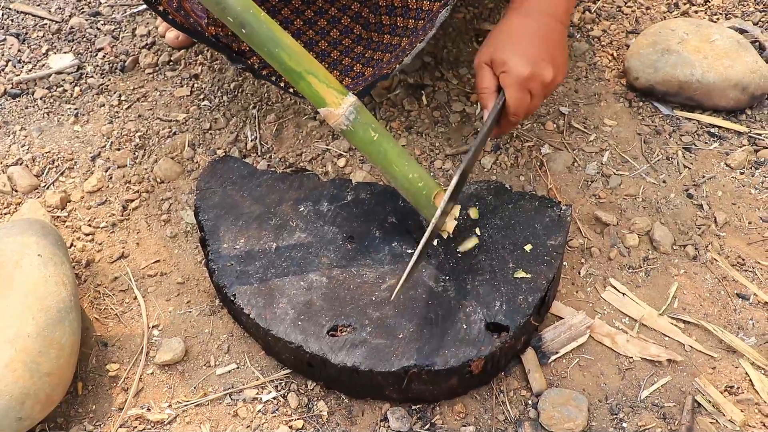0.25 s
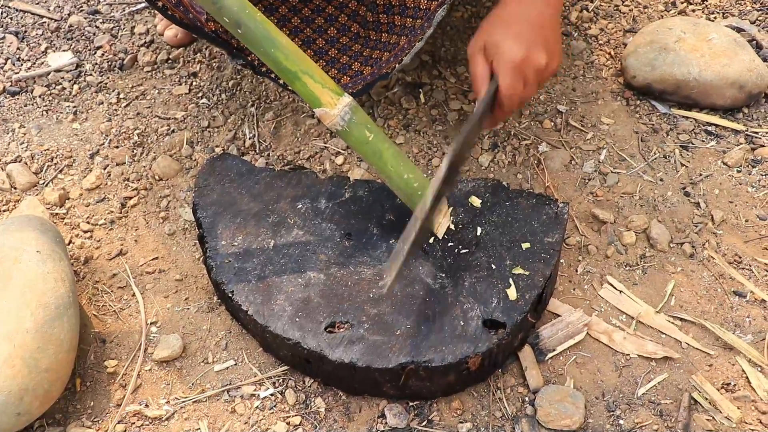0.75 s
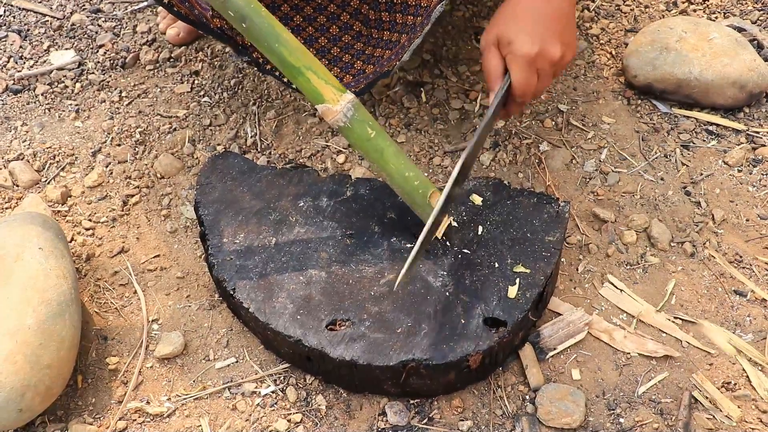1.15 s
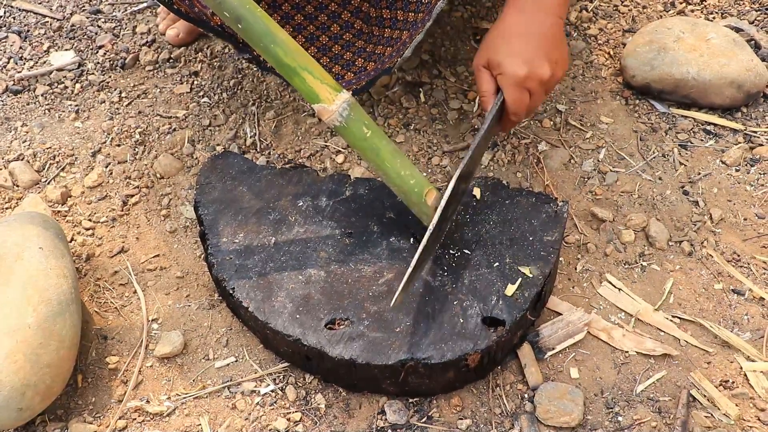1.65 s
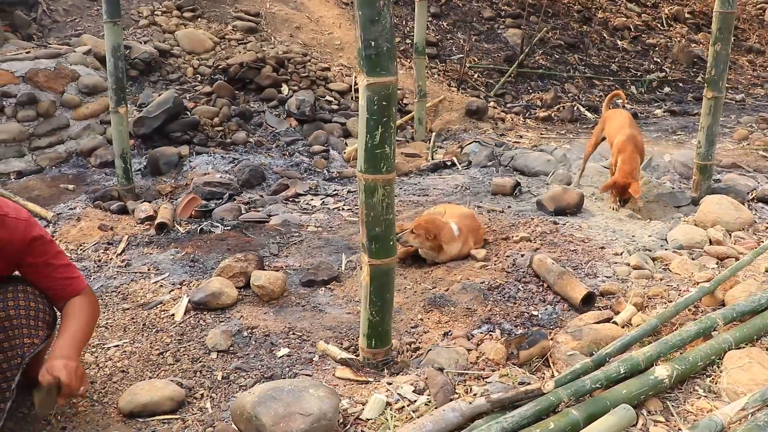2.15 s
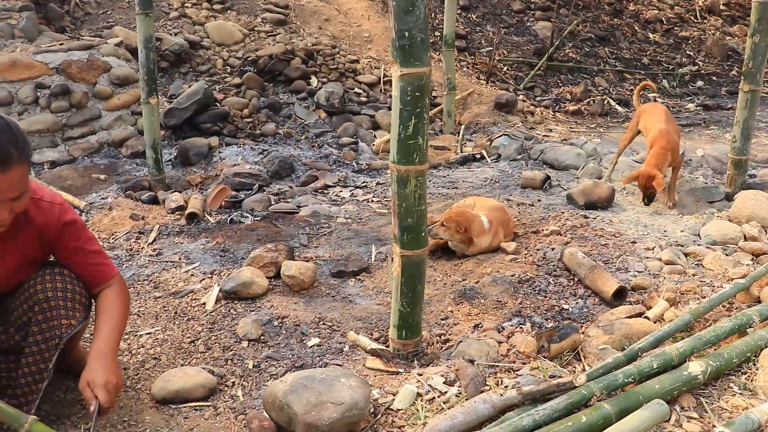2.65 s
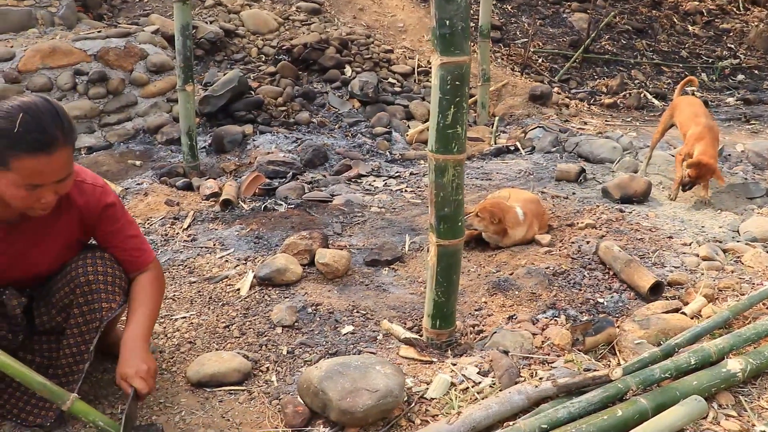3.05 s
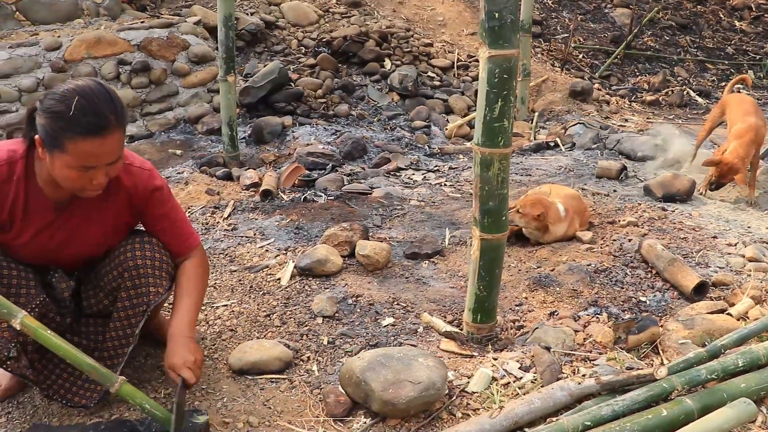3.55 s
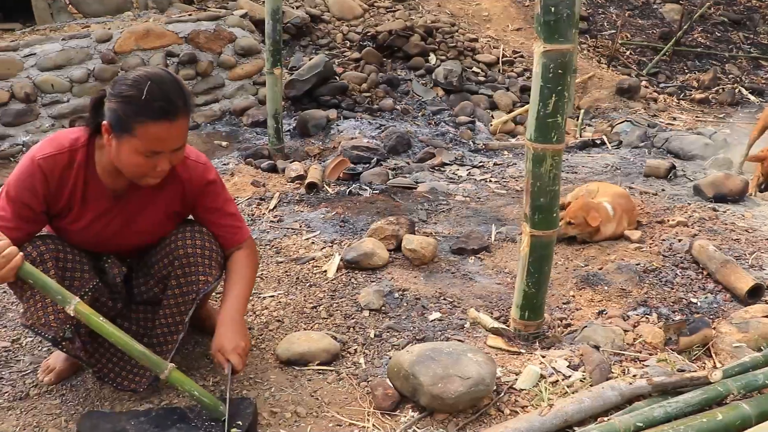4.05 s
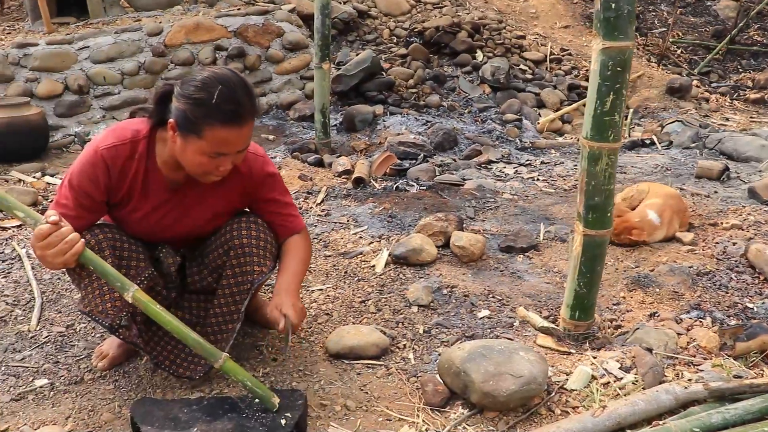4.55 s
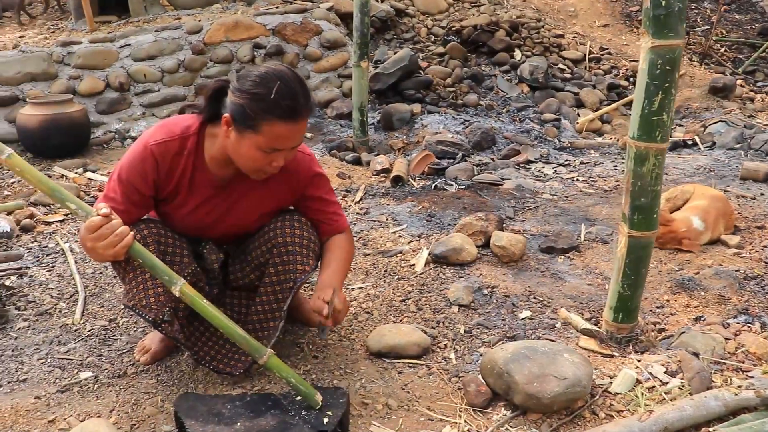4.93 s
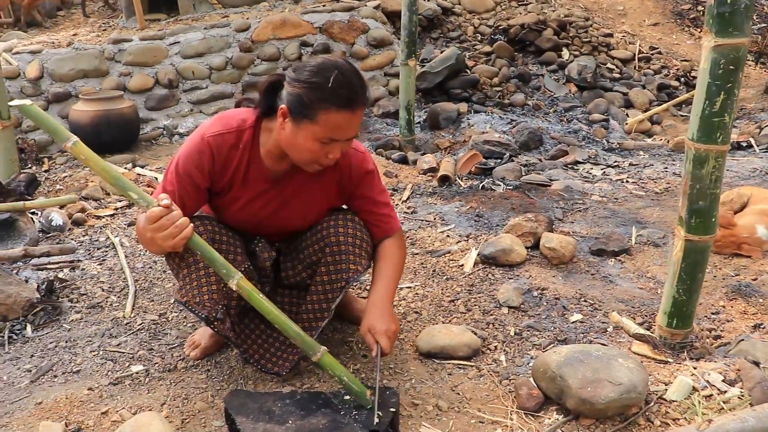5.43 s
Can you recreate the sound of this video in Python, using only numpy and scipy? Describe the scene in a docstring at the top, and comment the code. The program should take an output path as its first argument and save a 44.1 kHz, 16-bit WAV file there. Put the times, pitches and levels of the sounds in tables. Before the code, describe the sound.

A soft, low outdoor rush lies under everything. From 0 to 1.67 s the microphone is close to a heavy knife chopping green bamboo on a wooden block. Strokes at about 0.14, 0.51, 0.84, 1.16 and 1.47 s are short, dry crunches of snapping fibre with a bright splintery edge; the first two also hit the block with a loud, woody, hollow knock and a slight steel ring. Across the yard a chick gives rapid high peeps, falling then hooking upward, with a few faint fowl and bird calls. Total silence from 1.67 to 1.87 s. Then, a few steps away, thinner chops at about 1.88, 2.42, 3.05, 3.63, 4.06, 4.43, 4.80, 5.12 and 5.44 s, several with hollow tube knocks, especially 4.07 and 4.80. They carry more open-air scatter and a dull wall echo. Faint ticks and sandy scuffing fill gaps around 3.2 to 4.4 and 5.2 s.

```python
"""A forest yard with soft outdoor air, where a chick, other fowl and birds call across the yard.
A heavy knife chops a green bamboo pole on a wooden block: each stroke crunches through bursts of snapping fibres.
Some strokes knock on the block, where wood, hollow tube and steel ring together as resonances and dying sines.
Five strokes are heard with the microphone close by; after a short silence, nine more from a few steps away,
with more of the yard's scatter, a dull echo from a wall and faint spells of scuffing on dry ground."""
import sys
import numpy as np
from scipy import signal
from scipy.fft import rfft, irfft
from scipy.io import wavfile
from scipy.ndimage import uniform_filter1d

SR = 44100
rng = np.random.default_rng(int(sys.argv[2]) if len(sys.argv) > 2 else 0)


def transcribe(u):
    """Save the signal u as a 16-bit wav file named by the first command-line argument.

    u: samples, shape (n,) or (channels, n), limited to [-1, 1]; the rate is SR.
    q: integer samples, one column per channel.
    """
    v = np.clip(np.atleast_2d(u).T, -1, 1)
    q = np.round(v * 32767).astype(np.int16)
    wavfile.write(sys.argv[1], SR, q)


N = 250929
SILENCE_START_S, SILENCE_END_S = 1.665, 1.871  # between the close and the farther position
TAPS = 8192
HZ = np.fft.rfftfreq(TAPS, 1 / SR)

# The blade biting into the fibres, twice in each of the first two strokes. Each row: start in seconds,
# level in dB, length in seconds, brightness in dB per octave, pitch of the freed splinter in Hz.
CUTS = [(0.1401, -28.5, 0.0067, 1, 2370), (0.1454, -26, 0.013, -1.6, 2420), (0.508, -37, 0.014, -2.5, 2280),
        (0.5217, -32, 0.0068, 0.9, 4370), (0.8355, -24, 0.013, 0.4, 4340), (1.164, -22.5, 0.01, 0.5, 1626),
        (1.4679, -24.5, 0.0097, -0.5, 3413), (1.8753, -31, 0.0058, -0.2, 2610),
        (2.4245, -29, 0.0065, 0.45, 2773), (3.0467, -26.5, 0.0083, 1.6, 1520),
        (3.6251, -25.5, 0.01, 0.4, 3320), (4.0611, -28.5, 0.006, -0.3, 2580),
        (4.4308, -28.5, 0.0095, 1.8, 3380), (4.7992, -28, 0.0031, -0.5, 3310),
        (5.123, -28, 0.0072, 1.5, 3560), (5.438, -26.5, 0.013, 3, 2580)]
# Resonances of the pole. Each row: frequency in Hz, width in Hz, height in dB.
POLE = [(940, 35, 11), (1267, 47, 14.5), (1590, 27, 18), (2014, 60, 13.5), (2424, 120, 3.5),
        (2700, 130, 4.5), (3080, 80, 6.5), (3530, 82, 4.5), (4700, 80, 3.5), (5256, 88, 10),
        (5760, 130, 8.5), (7630, 120, 1), (9300, 30, 3)]
# Broad colour of the snapping fibres. Each row: frequency in Hz, relative level in dB per Hz.
FIBRE = [(40, -26.5), (110, -7), (200, -6.5), (350, -7.5), (600, -0.5), (1500, -4), (3000, 2), (4200, -3.5),
         (6000, -5), (9000, -8), (13000, -9.5), (16000, -19)]


def amp(db):
    """Decibels to gain."""
    return 10 ** (np.asarray(db) / 20)


def evened(x):
    """Scales to rms 1."""
    return x / np.sqrt(np.mean(x ** 2) + 1e-20)


def read(points, hz):
    """Reads a table of (Hz, value) on a log-frequency axis."""
    table_hz, value = np.transpose(points)
    return np.interp(np.log(hz + 1), np.log(table_hz), value)


def add(mix, s, sound):
    """Mixes a sound in at time s, in seconds."""
    start = round(s * SR)
    sound = sound[max(-start, 0):]
    part = mix[max(start, 0):][:len(sound)]
    part += sound[:len(part)]


def at_level(x, db):
    """Gives a blow the energy of 20 ms at this level."""
    return amp(db) * x / np.sqrt(np.sum(x ** 2) / (SR / 50))


def from_here(s, near, far):
    """Picks what holds for the microphone's distance at time s."""
    return far if s > SILENCE_START_S else near


def air(patch_db=1.6, level_db=-66.5):
    """Soft outdoor rush: coloured noise with slowly drifting patches, under a slow swell."""
    # Each row: frequency in Hz, relative level in dB per Hz.
    air_colour = [(25, -10), (55, 1.5), (85, -7), (150, -9), (380, -14), (900, -10), (1300, -13),
                  (2000, -16.5), (3200, -21.5), (5500, -26), (8000, -33), (12000, -32.5), (16000, -37)]
    # Each row: time in seconds, level in dB on top of level_db.
    swell = [(0, 9.5), (1.602, 8.5), (1.9, 6.5), (5.6, 9.5)]
    hz, t, z = signal.stft(rng.standard_normal(N), SR, nperseg=2048, noverlap=1536)
    patches = uniform_filter1d(rng.standard_normal(z.shape), size=20, axis=0)
    patches = evened(uniform_filter1d(patches, size=8, axis=1))
    gain = amp(read(air_colour, hz)[:, None] + patch_db * patches)
    rush = signal.istft(z * gain, SR, nperseg=2048, noverlap=1536)[1][:N]
    return evened(rush) * amp(level_db + np.interp(np.arange(N) / SR, *np.transpose(swell)))


def whistle(hz, db, octave_db, flutter_db=3.5, edge_s=0.0059, waver=0.007):
    """A near sine and its overtones; their levels flutter, and the pitch wavers more towards the end."""
    t = np.arange(len(hz)) / SR
    jitter = evened(uniform_filter1d(rng.standard_normal(TAPS * 2), size=60))[:len(t)]
    flutter = evened(uniform_filter1d(rng.standard_normal((2, TAPS * 2)), size=450))[:, :len(t)]
    wavering = 1 + waver * (0.5 + 2 * (t / t[-1]) ** 2) * jitter
    phase = 2 * np.pi * np.cumsum(hz * wavering) / SR
    ground = amp(db + flutter_db * flutter[0]) * np.sin(phase)
    overtones = np.sin(2 * phase) + amp(-18.5) * np.sin(3 * phase)
    tone = ground + amp(octave_db + flutter_db * flutter[1]) * overtones
    edges = np.minimum(np.minimum(t, t[::-1]) / edge_s, 1)
    return np.sqrt(2) * tone * edges


def chick(glide_octave_db=-63, hook_octave_db=-71, fade_db=-12):
    """Each peep glides down, then dips and hooks up, fading as it rises; overtones peak in mid-glide."""
    # Each row: start in seconds, length of the glide in seconds, first pitch in Hz,
    # level of the glide in dB, level of the closing hook in dB.
    peeps = [(-.02, 0.13, 4634, -54, -57), (0.216, 0.074, 4780, -63, -59.5),
             (0.413, 0.084, 4760, -54.5, -47), (0.599, 0.081, 4840, -57, -43.5),
             (0.776, 0.067, 4820, -54, -46), (.937, 0.065, 4850, -49, -37.5),
             (1.108, .042, 4860, -53, -52.5), (1.268, .028, 5120, -58, -45.5),
             (1.411, 0.039, 5560, -58.5, -49)]
    sag_hz_per_s = 4400  # steady sinking during the glide
    hook_s = 0.029  # down and back up
    dip_target_hz, dip_share = 3650, 0.49  # the hook dips this share of the way to the target
    accent_db, accent_s = 2.5, 0.012  # brief accent at the start
    out = np.zeros(N)
    for s, glide_s, first_hz, glide_db, hook_db in peeps:
        t = np.arange(round((glide_s + hook_s) * SR)) / SR
        glide = np.minimum(t / glide_s, 1)
        hook = np.clip((t - glide_s) / hook_s, 0, 1)
        glide_hz = first_hz - sag_hz_per_s * glide_s * glide
        hz = glide_hz - dip_share * (glide_hz - dip_target_hz) * np.sin(np.pi * hook) ** 2
        db = np.interp(hook, [0, 0.2, 0.55, 1], [glide_db, hook_db, hook_db, hook_db + fade_db])
        db += accent_db * np.exp(-t / accent_s)
        octave_db = hook_octave_db + (glide_octave_db - hook_octave_db) * np.sin(np.pi * glide)
        add(out, s, whistle(hz, db, octave_db))
    return out


def birds(octave_db=-19, settle=2.0):
    """Each distant call slides from one pitch to another, fast at first and then settling."""
    # Plain calls of hens and other birds farther off. Each row: start in seconds, length in seconds,
    # first pitch in Hz, last pitch in Hz, level in dB.
    calls_afar = [(0.069, 0.045, 1175, 970, -54.5), (0.311, 0.085, 933, 898, -61.5),
                  (0.581, .055, 7400, 4690, -57.5), (0.873, 0.11, 470, 616, -57.5),
                  (2.118, 0.037, 5190, 5220, -68), (3.938, 0.022, 1090, 1153, -56)]
    out = np.zeros(N)
    for s, length, first_hz, last_hz, db in calls_afar:
        left = np.linspace(1, 0, round(length * SR))
        hz = last_hz + (first_hz - last_hz) * left ** settle
        add(out, s, whistle(hz, db, db + octave_db))
    return out


def scatter(t60_scale):
    """Diffuse returns from stones, ground and trees: noise in which each band dies at its own speed."""
    # Each row: frequency in Hz, t60 in seconds before t60_scale.
    band_decay = [(100, 0.54), (260, 0.27), (700, 0.075), (1800, .11), (5000, 0.14), (13000, 0.078)]
    hz, t, z = signal.stft(rng.standard_normal(SR // 2), SR, nperseg=128)
    t60 = t60_scale * read(band_decay, hz)[:, None]
    tail = signal.istft(z * amp(-60 * t / t60), SR, nperseg=128)[1]
    tail *= 1 - np.exp(-(np.arange(len(tail)) / SR / 0.0014) ** 2)  # soft onset
    return tail / np.linalg.norm(tail)


def fowl(scatter_db=-11):
    """The chick and the other birds call from across the yard, blurred by its scatter."""
    calls = chick() + birds()
    return calls + amp(scatter_db) * signal.fftconvolve(calls, scatter(0.71))[:N]


def body(spectrum, resonances, tilt_db):
    """Causal (minimum-phase) impulse response of a broad colour with resonances standing out of it."""
    peaks = 1 + sum(amp(db) ** 2 / (1 + (2 * (HZ - hz) / width) ** 2) for hz, width, db in resonances)
    slope = tilt_db * np.log2(np.maximum(HZ, 400) / 400)  # dB, from 400 Hz up
    log_gain = np.log(amp(read(spectrum, HZ) + slope) * np.sqrt(peaks))
    circle = np.r_[log_gain, log_gain[-2:0:-1]]
    response = np.exp(np.conj(signal.hilbert(circle)))[:len(HZ)]
    return irfft(response)[:TAPS // 2]


def crunch(length, spread_db=3, snaps_per_s=9000):
    """Fibres snap in quick succession while the edge moves; the push is even in the bass, ragged in the treble."""
    u = np.arange(TAPS // 4) / (length * SR)
    stroke = np.minimum(0.35 + 2 * u, 1) / (1 + u ** 8)
    sizes = amp(spread_db * np.minimum(rng.exponential(1, len(u)), 3)) * rng.choice([-1, 1], len(u))
    snaps = sizes * (rng.random(len(u)) < snaps_per_s / SR)
    rasp = 0.38 * rng.standard_normal(len(u))
    z = rfft(stroke * (snaps + rasp), TAPS)
    ripple = evened(np.sqrt(uniform_filter1d(abs(z) ** 2, size=9) + 1e-9))
    evenness = read([(2000, 0.9), (5000, 0.3)], HZ)
    return irfft(z / ripple ** evenness)[:len(u)] / (1 + (u / 2) ** 4)


def cuts(splinter_width=85, splinter_db=14):
    """The edge crunches into the ringing pole; each cut frees a splinter of its own pitch."""
    # Further resonances of the pole pressed on the block, heard from close by and from farther off.
    # Each row: frequency in Hz, width in Hz, height in dB.
    held_near = [(620, 80, 7.5), (840, 100, 15.5), (4750, 200, 9)]
    held_far = [(158, 78, 9.7), (256, 100, 6), (540.5, 89, 14.4)]
    out = np.zeros(N)
    for s, db, length, tilt_db, splinter_hz in CUTS:
        splinter = (splinter_hz, splinter_width, splinter_db)
        rings = [*POLE, *from_here(s, held_near, held_far), splinter]
        add(out, s, at_level(signal.fftconvolve(crunch(length), body(FIBRE, rings, tilt_db)), db))
    return out


def splinters(below_db=-39, fade_db_per_s=230, tilt_db=2, snaps_per_s=700):
    """After each cut, strained fibres go on giving way: a thin crackle that dies out."""
    out, t = np.zeros(N), np.arange(TAPS) / SR
    for s, db, *_ in CUTS:
        snaps = (rng.random(TAPS) < snaps_per_s / SR) * rng.standard_normal(TAPS)
        snaps = snaps * amp(-fade_db_per_s * t)
        snap = at_level(body(FIBRE, [], tilt_db), db + below_db)
        add(out, s, signal.fftconvolve(snaps, snap))
    return out


def brightness(db, reference_db, reference_tilt_db, tilt_per_db):
    """The harder the blow, the more its spectrum tilts towards the treble."""
    return reference_tilt_db + tilt_per_db * (db - reference_db)


def knocks(near_steel_db=-24, far_steel_db=-14.5, end_width=50, near_end_db=14, far_end_db=15.5):
    """The block stops the blade, or the blade bounces: wood, hollow tube, cut end and steel ring together."""
    # Each row: start in seconds, level in dB, contact in seconds, pitch of the cut end in Hz.
    block_hits = [(0.1598, -15, 0.0012, 2290), (0.1884, -34.5, 0.0046, 1350), (0.521, -14, 0.001, 2213),
                  (0.5588, -33.5, 0.00099, 990), (3.633, -23, 0.007, 854), (4.065, -18.5, 0.0054, 2925),
                  (4.4446, -32.5, 0.0066, 2740), (4.801, -19.5, 0.0035, 2788), (5.447, -27.5, 0.0059, 2520)]
    # Broad colour of the thud. Each row: frequency in Hz, relative level in dB per Hz.
    thud = [(40, -20.5), (110, -12), (220, -3.5), (400, -3.5), (750, 4.5), (1200, -0.5), (1700, -6),
            (3200, -4.5), (4000, -15), (5800, -16.5), (8000, -30), (16000, -45.5)]
    # Resonances of the block under the blade. Each row: frequency in Hz, width in Hz, height in dB.
    block = [(256, 61, 10), (471.3, 84, 1.5), (981, 100, 0), (1530, 77, 2.5), (1890, 150, 7.5),
             (2286, 72, 12), (3230, 89, 8)]
    # What else rings: close by mostly the block, farther off mostly the hollow tube. Columns as for the block.
    ring_near = [(660, 90, 14), (858, 100, 22), (1290, 50, 10.5)]
    ring_far = [(541, 104, 8.8), (856, 130, 5.7), (1267, 75, 19.8)]
    # Modes of the steel blade. Each row: frequency in Hz, relative level in dB, t60 in seconds.
    steel_modes = [(873, -1.5, 0.14), (1720, -9.5, 0.074), (2230, -8.5, 0.088), (2514, -3.5, 0.12),
                   (2950, 2, 0.088), (3280, 0, 0.057), (4280, -15, .08), (4920, -12.5, 0.11),
                   (6050, -16, 0.11), (7005, -16.5, 0.037)]
    # Reference level in dB, brightness there in dB per octave, brightness gained per dB of level.
    tilt_near, tilt_far = (-11.5, 1.2, 0.11), (-33.5, 1.4, 0.02)
    out, t = np.zeros(N), np.arange(TAPS) / SR
    for s, db, contact, end_hz in block_hits:
        cut_end = (end_hz, end_width, from_here(s, near_end_db, far_end_db))
        rings = [*block, *from_here(s, ring_near, ring_far), cut_end]
        wood = body(thud, rings, brightness(db, *from_here(s, tilt_near, tilt_far)))
        add(out, s, at_level(signal.fftconvolve(crunch(contact), wood), db))
        steel = sum(amp(mode_db - 60 * t / t60) * np.sin(2 * np.pi * (hz * t + rng.random()))
                    for hz, mode_db, t60 in steel_modes)
        steel = steel * (1 - np.exp(-t / 0.0013))  # soft onset
        add(out, s, at_level(steel, db + from_here(s, near_steel_db, far_steel_db)))
    return out


def ticks(soft_hz=9000, length_s=0.0027):
    """Small dry ticks of chips and grit and of the blade being lifted: short crunches, softened on top."""
    # Each row: start in seconds, level in dB before softening, brightness in dB per octave.
    small_ticks = [(0.735, -60, 4), (1.086, -60, 5.5), (2.127, -57, 8.5), (3.404, -57, -4), (3.471, -52, 3),
                   (3.488, -62, 4), (3.737, -58, 6.5)]
    out = np.zeros(N)
    for s, db, tilt_db in small_ticks:
        add(out, s, at_level(signal.fftconvolve(crunch(length_s), body(FIBRE, POLE, tilt_db)), db))
    return signal.sosfilt(signal.butter(1, soft_hz, fs=SR, output="sos"), out)


def scuffs(grains_per_s=60):
    """Sand and dry litter crackle faintly in short spells of scattered grains."""
    # Each row: start in seconds, length in seconds, level of a grain in dB before its random size.
    spells = [(3.181, .16, -70), (3.498, .1, -68.5), (3.715, .11, -69.5), (4.19, .18, -75.5),
              (5.217, .15, -70)]
    out = np.zeros(N)
    for s, length, db in spells:
        grains = (rng.random(SR // 4) < grains_per_s / SR) * amp(4 * rng.uniform(-1, 1, SR // 4))
        grain = at_level(signal.fftconvolve(crunch(0.0008), body(FIBRE, [], tilt_db=0.5)), db)
        add(out, s, signal.fftconvolve(grains[:round(length * SR)], grain))
    return out


def yard(x, near_db=-16, far_db=-8, trees_db=-31, wall_db=-18, wall_hz=330, wall_s=0.092):
    """From farther off the scatter is stronger and a dull echo returns from a wall."""
    far = np.arange(N) > SILENCE_START_S * SR
    out = x + signal.fftconvolve(x * amp(np.where(far, far_db, near_db)), scatter(0.55))[:N]
    out += amp(trees_db) * signal.fftconvolve(x, scatter(2.4))[:N]
    dull = signal.sosfilt(signal.butter(2, wall_hz, fs=SR, output="sos"), x * far)
    add(out, wall_s, amp(wall_db) * dull)
    return out


def scene():
    """Chopping and fowl in the yard, over the outdoor air."""
    chopping = cuts() + splinters() + knocks() + ticks() + scuffs()
    return (yard(chopping) + fowl() + air())[None]


def record(dry, ceiling=0.92, edge_hz=16200):
    """Silence between the close and the farther position; then clipping at a ceiling and a treble limit."""
    t = np.arange(N) / SR
    sounding = (t < SILENCE_START_S) | (t > SILENCE_END_S)
    live = uniform_filter1d(1.0 * sounding, size=200)
    low_pass = signal.firwin(255, edge_hz, window=("kaiser", 9), fs=SR)
    return signal.oaconvolve(np.clip(dry * live, -ceiling, ceiling), low_pass[None], "same")


dry = scene()
out = record(dry)
transcribe(out)
```